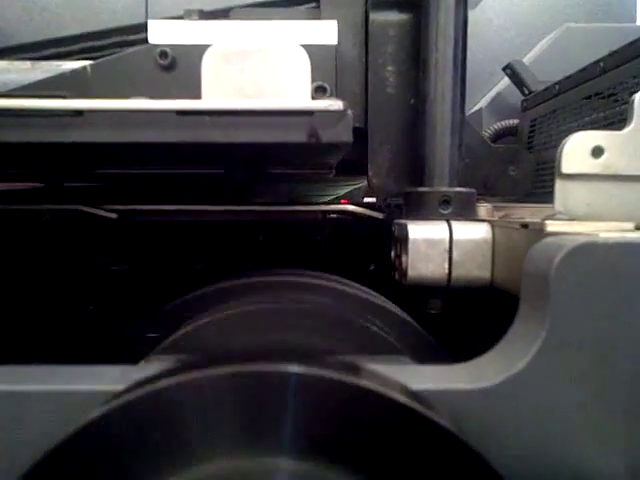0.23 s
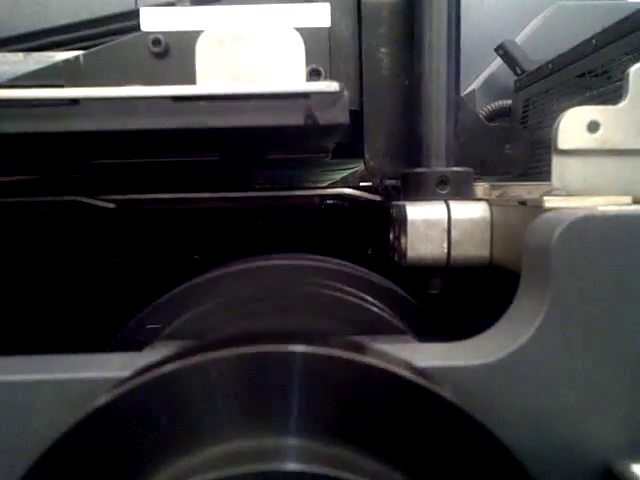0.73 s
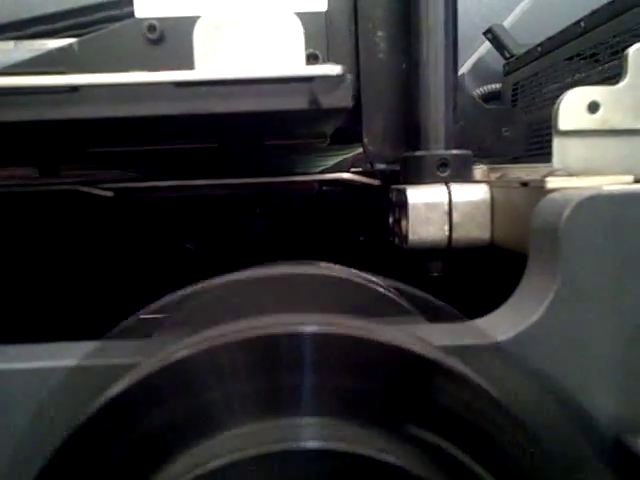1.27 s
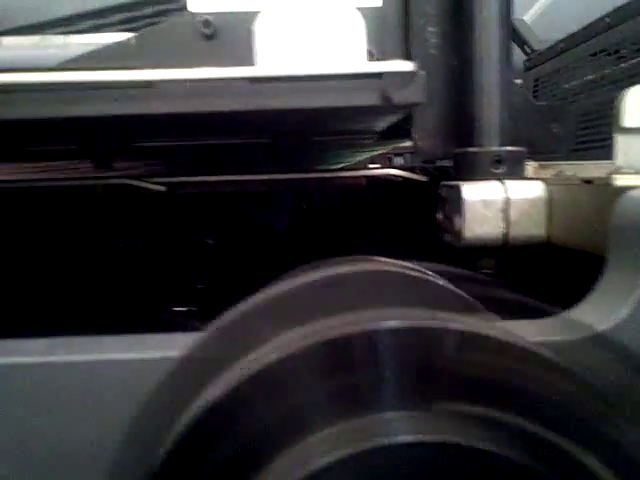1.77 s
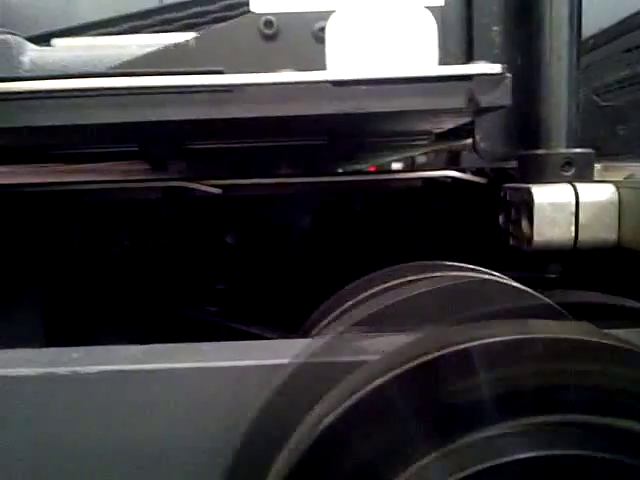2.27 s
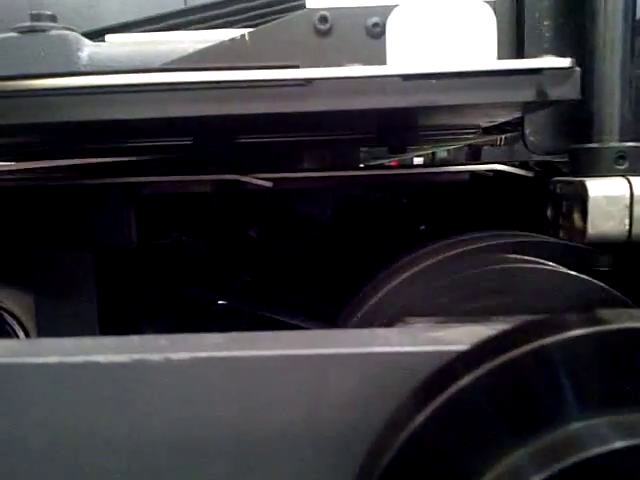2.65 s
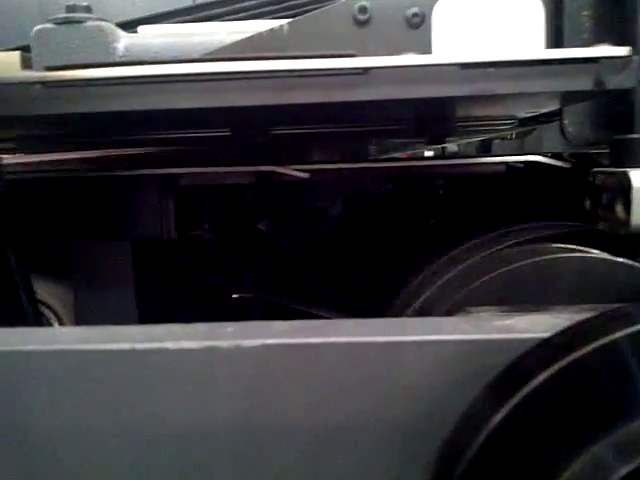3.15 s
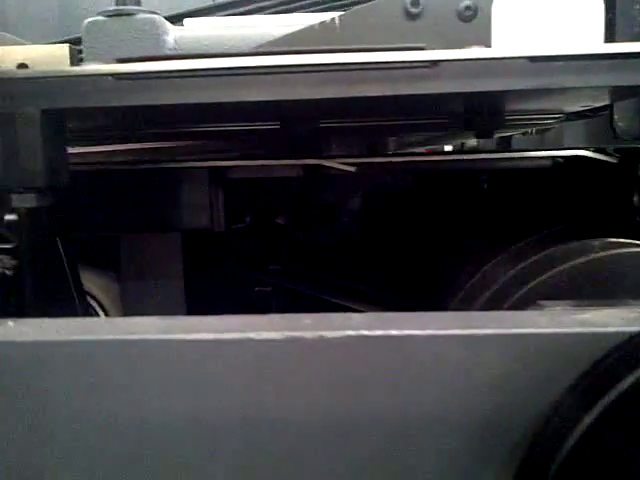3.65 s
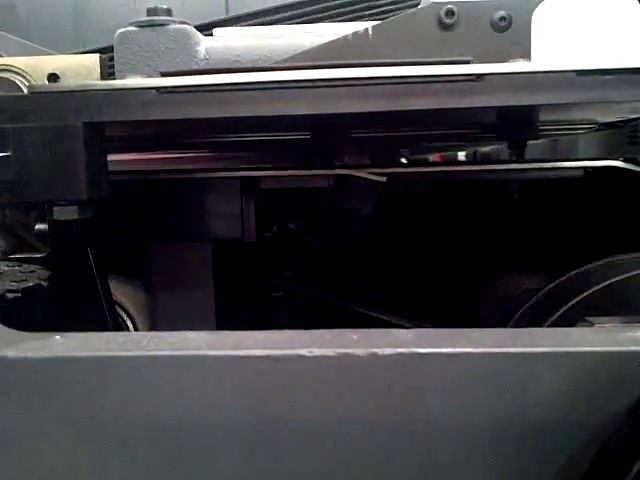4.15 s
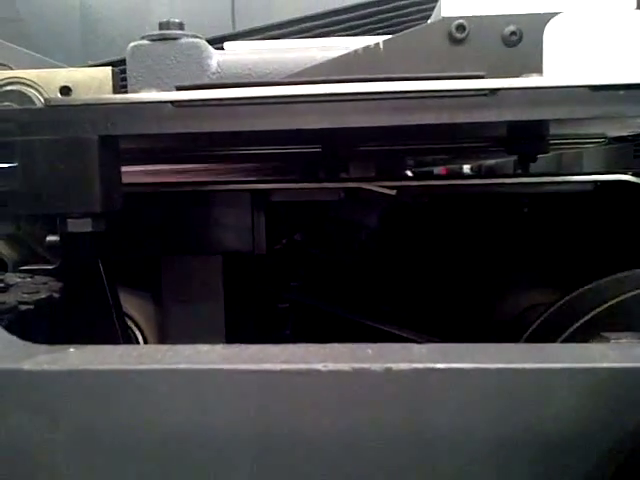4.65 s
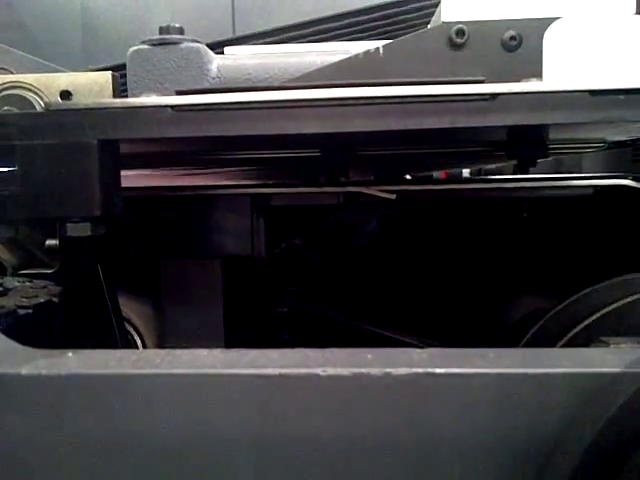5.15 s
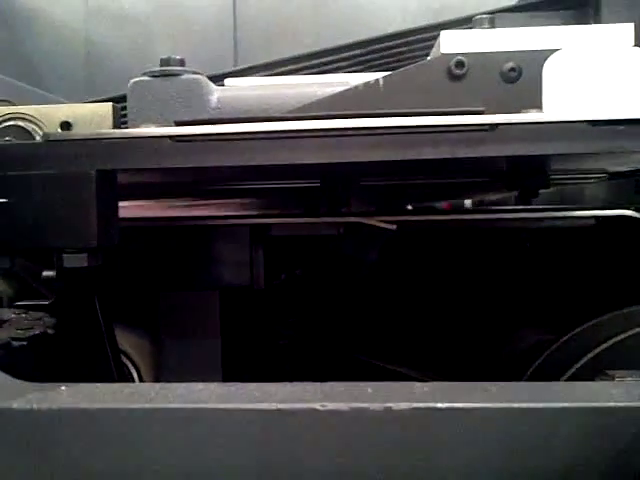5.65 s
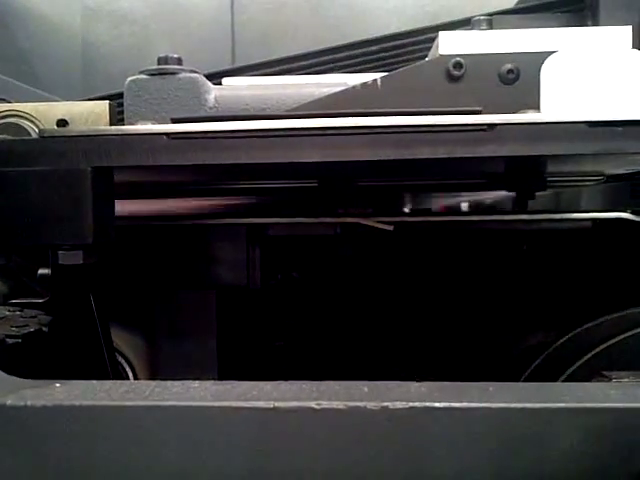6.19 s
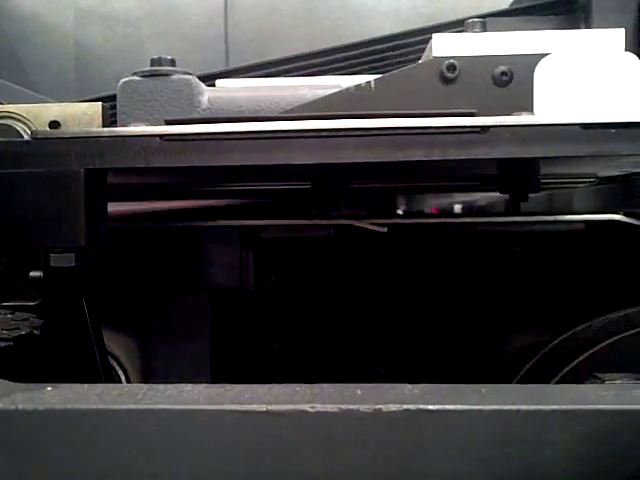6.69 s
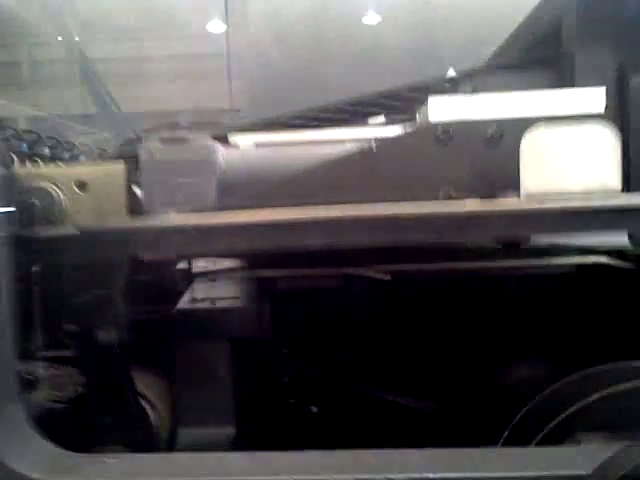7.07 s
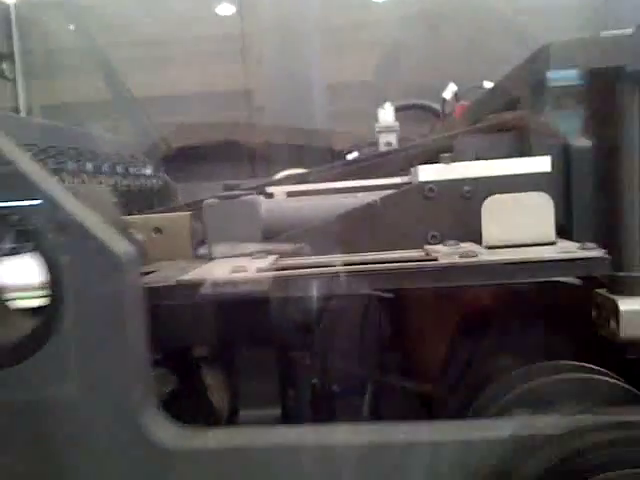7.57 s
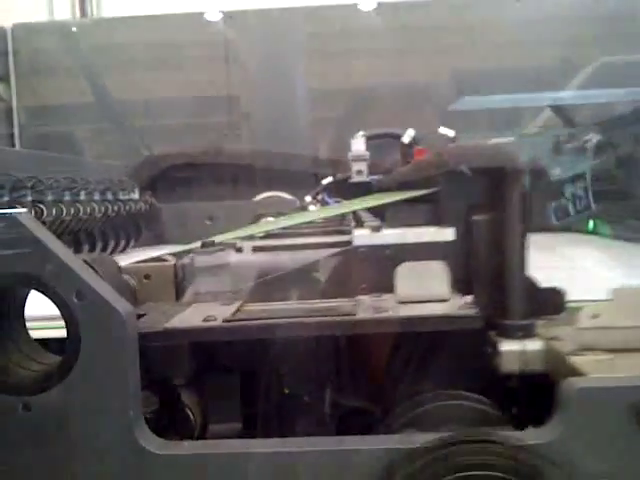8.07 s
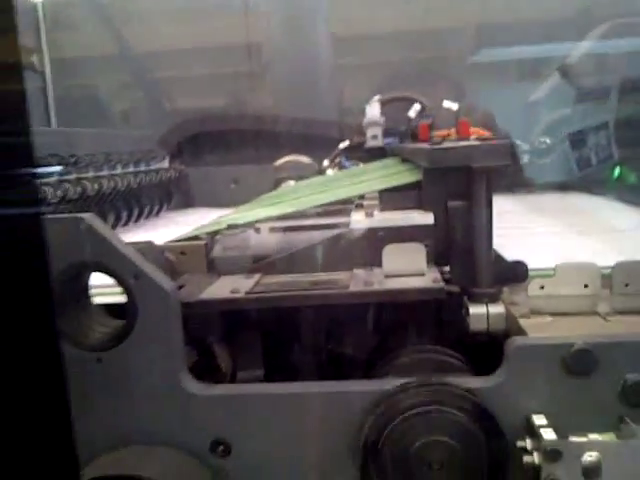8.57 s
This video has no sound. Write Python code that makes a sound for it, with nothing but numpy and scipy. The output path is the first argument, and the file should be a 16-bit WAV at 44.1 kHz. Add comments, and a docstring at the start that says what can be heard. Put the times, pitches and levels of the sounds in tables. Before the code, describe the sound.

A heavy press turns at unchanging speed, heard very near its frame. Hollow rattling taps and panel booms open it, then settle into dense rumble, knocks and gear clatter, with a short clack each turn, some ringing. In the last two seconds the gears recede, swishing paper hiss opens up, and a wavering thin whine and very faint high whistle appear.

```python
"""A large printing press runs steadily, about four turns a second, heard close to its frame and gears.
Each turn brings rumble and gear chatter from repeating random roughness, knocks from damped sines,
a swish of filtered noise for the paper, and a metal clack of noise bursts, on many turns with a ring.
Gears and a motor hum as sums of sines; at first something loose rattles in taps that fall in pitch.
Near the end the microphone lifts away from the gears toward the paper path, and thin whines swell."""
import sys
import numpy as np
from scipy import signal
from scipy.fft import rfft, irfft
from scipy.io import wavfile
from scipy.ndimage import uniform_filter1d, map_coordinates

SR = 44100
rng = np.random.default_rng(int(sys.argv[2]) if len(sys.argv) > 2 else 0)


def wav_out(sig):
    """Save sig, one row per channel (or a flat mono array), as 16-bit PCM at SR to the path in sys.argv[1]."""
    wavfile.write(sys.argv[1], SR, np.round(np.clip(np.atleast_2d(sig).T, -1, 1) * 32767).astype(np.int16))


N = 389400

TURN_HZ = 4.1671  # turns of the main shaft per second
# clacks with their own time and strength, light or hard:
# (time [s], clack level [dB], tick level [dB], centre of the ring [Hz])
LISTED_CLACKS = [(.005, -24, -27.5, 2900), (.247, -28.5, -33, 2900), (.486, -22, -30.5, 2950),
                 (.966, -26, -25, 2800), (1.206, -20, -29, 2650), (1.928, -24, -28, 2900),
                 (2.644, -23, -21, 2710), (2.886, -21.5, -19, 2650), (3.127, -25.5, -23.5, 3000),
                 (3.847, -25, -31, 2710), (4.087, -21, -25.5, 2500), (4.326, -22, -23.5, 2800),
                 (4.565, -29, -18.5, 3400), (5.045, -24.5, -21.5, 3010), (5.286, -26, -21.5, 3400),
                 (5.526, -21, -22, 2720), (6.006, -19, -16, 1650), (6.486, -26.5, -17.5, 3430),
                 (6.966, -23, -23, 2700), (7.4455, -21.5, -13, 1950), (7.6843, -21, -13.5, 2200),
                 (7.925, -25.5, -19.5, 3000), (8.167, -23.5, -30, 2000), (8.406, -23.5, -26.5, 1950)]


def undb(db):
    """Decibels are logarithmic: 20 dB is a factor of ten in amplitude."""
    return 10 ** (np.asarray(db) / 20)


def unit(x):
    """Normalize the mean power: scale to rms 1."""
    return x / np.sqrt(np.mean(x ** 2))


def clock():
    """Uniform sampling: the time of every sample in seconds."""
    return np.arange(N) / SR


def curves(rows):
    """Linear interpolation in time of each column of a table."""
    times, *columns = np.transpose(rows)
    return [np.interp(clock(), times, column) for column in columns]


def swells(rows):
    """Superposed Gaussian swells in dB, from rows of (time [s], half width [s], level [dB])."""
    return sum(db * np.exp(-((clock() - at) / width) ** 2) for at, width, db in rows)


def walk(rate):
    """Low-pass random fluctuation of rms 1: values held for 1 / rate seconds, smoothed twice."""
    hold = int(SR / rate)
    steps = np.repeat(rng.standard_normal(N // hold + 1), hold)
    smooth = uniform_filter1d(uniform_filter1d(steps, hold), hold)
    return unit(smooth[:N])


def colour(x, points):
    """Linear filtering: weight the spectrum of x by (frequency [Hz], level [dB]) points, to rms 1."""
    hz, db = np.transpose(points)
    f = np.maximum(np.fft.rfftfreq(N, 1 / SR), 1)
    gain = undb(np.interp(np.log(f), np.log(hz), db))
    bass_fall = np.minimum(f / hz[0], 1)  # below the first point
    return unit(irfft(rfft(x) * gain * bass_fall, N))


def heard(levels_db, lift):
    """Distance changes the balance: gain of a part at the microphone's height."""
    beside_db, change_db = levels_db
    return undb(beside_db + change_db * lift)


def surface(turns, count):
    """Periodic excitation: a wheel's random roughness comes round again every count turns."""
    size = int(count * SR / TURN_HZ)
    phases = 2 * np.pi * rng.random(size // 2 + 1)
    profile = unit(irfft(np.exp(1j * phases), size))
    return map_coordinates(profile, [turns / count % 1 * size], order=3, mode="grid-wrap")


def rolling(turns, half_speed_db, loose_db):
    """Rolling noise: shaft and half-speed cylinders repeat their roughness; bearing play never does."""
    shaft = surface(turns, count=1)
    cylinders = undb(half_speed_db) * surface(turns, count=2)
    play = undb(loose_db) * rng.standard_normal(N)
    return shaft + cylinders + play


def frame(turns, lift, surge_db, panel_db):
    """Forced vibration: rolling cylinders shake the heavy frame, and a panel booms as the load surges."""
    # relative spectra: (frequency [Hz], level [dB per Hz])
    frame_spectrum, panel_spectrum = [(25, -36), (41, -30), (47, -10), (63, -19), (84, -6.5), (118, -9.5),
                                      (145, -1), (200, 2), (240, -1.5), (320, 1), (430, -1.5), (560, -6.5),
                                      (800, -14), (6000, -80)], [(180, -42), (255, -3.5), (320, -0.5), (385, -2.5),
                                                     (520, -21.5), (2000, -79.5)]
    # booms of the panel: (time [s], half width [s], extra level [dB])
    booms = [(.10, .025, 4.5), (.37, 0.039, 10), (.62, .03, 5), (1.15, 0.043, 7), (1.3, .035, 6),
             (3.1, 0.049, 9)]
    shake = rolling(turns, half_speed_db=-6.5, loose_db=-1.0)
    panel = colour(rolling(turns, half_speed_db=-3.0, loose_db=-2.5), panel_spectrum)
    boom_db = panel_db + swells(booms) + surge_db * walk(12)
    return colour(shake, frame_spectrum) + (1 - lift) * undb(boom_db) * panel


def gears(turns, tooth_depth, flutter_db):
    """Amplitude modulation: gear chatter pulses as teeth and chain links engage."""
    # relative spectrum: (frequency [Hz], level [dB per Hz])
    gear_spectrum = [(300, -19.5), (480, -3.5), (620, -1.5), (760, -2.5), (920, 0.5), (1080, -3),
                     (1380, -2.5), (1650, -7.5), (1850, -11), (2150, -19), (3000, -20), (7500, -71)]
    engagements = (7, 12, 14, 38)  # per turn
    teeth = sum(np.cos(2 * np.pi * (k * turns + rng.random())) for k in engagements)
    chatter = rolling(turns, half_speed_db=-3.5, loose_db=1.5) * (1 + tooth_depth * teeth)
    return colour(chatter * undb(flutter_db * walk(60)), gear_spectrum)


def paper(turns, lift, swish_s, swish_width_s, swish_db, grain_db):
    """Friction noise: paper hisses over rollers with a fine patter and a swish per turn, open from above."""
    # relative spectra: (frequency [Hz], level [dB per Hz])
    beside_spectrum, above_spectrum = [(500, -11), (1000, -2), (1900, -4), (2250, -5), (2800, -1.5),
                                       (3200, -3), (3700, -8), (4100, -7), (4700, -14), (5500, -19),
                                       (6400, -26.5), (7000, -33), (7600, -41.5)], [(500, -4), (1000, -4), (1900, 6.5), (2600, -1),
                                                      (3200, -8.5), (3700, -8.5), (4100, -5), (4700, -15),
                                                      (5500, -20.5), (6400, -25.5), (7000, -33.5),
                                                      (7600, -49)]
    since = turns % 1 / TURN_HZ
    swish = swish_db * np.exp(-((since - swish_s) / swish_width_s) ** 2)
    patter = grain_db * walk(250)
    rub = rolling(turns, half_speed_db=-3.0, loose_db=6.0) * undb(swish + patter)
    return (1 - lift) * colour(rub, beside_spectrum) + lift * colour(rub, above_spectrum)


def tones(turns, lift, mesh_waver_db, mesh_jitter_rad, motor_waver_db, slip_rad):
    """Phase locking: mesh tones follow the turn, while motor, pump and drive tones slip with the load."""
    # gear mesh and shaft tones: (order [cycles per turn])
    mesh_orders = [12, 20, 26, 34, 46, 57, 74, 77, 85, 86, 96, 144, 160, 242, 330, 440, 550, 660]
    # their strength: (relative rms level beside the gears [dB], change above the paper path [dB])
    mesh_levels = [(-40.5, -4.5), (-44, -0.5), (-41, -2.5), (-37.5, 4.5), (-36, -3.5), (-39, -2.5),
                   (-34.5, -5), (-36.5, -6), (-37, -4), (-36.5, -3.5), (-43, 4.5), (-41, -8.5), (-39.5, -2),
                   (-42, -11), (-34, -10), (-46, -5.5), (-49, 3), (-56, -2.5)]
    # free tones: (frequency [Hz], relative rms level beside the gears [dB], change above [dB])
    motor_tones = [(94.8, -35, 1), (189.7, -30, 1), (202, -38, -1), (285, -31.5, -6), (529.4, -35, -3),
                   (999, -34.5, -12.5), (2880, -59, 2)]
    out = np.zeros(N)
    for k, (db, change_db) in zip(mesh_orders, mesh_levels):
        backlash = mesh_jitter_rad * walk(24)  # play between the teeth roughens each tone
        level_db = db + lift * change_db + mesh_waver_db * walk(16)
        out += undb(level_db) * np.sin(2 * np.pi * (k * turns + rng.random()) + backlash)
    for hz, db, change_db in motor_tones:
        slip = slip_rad * walk(5)
        level_db = db + lift * change_db + motor_waver_db * walk(9)
        out += undb(level_db) * np.sin(2 * np.pi * (hz * clock() + rng.random()) + slip)
    return np.sqrt(2) * out  # rms to peak


def drone(turns, lift):
    """Load modulation: swings of load in each turn put sidebands, here separate sines, by the mesh tones."""
    # two mesh tones of the main gears and their sidebands: (order [cycles per turn])
    drone_orders = [110, 112, 113, 114, 120]
    # their strength: (relative rms level beside the gears [dB], change above the paper path [dB])
    drone_levels = [(-37.5, 0), (-28.3, 1.5), (-32, 0), (-34.5, -1), (-29.3, 3.5)]
    # level of the whole drone: (time [s], level [dB])
    drone_swell = [(.25, -6), (.7, -2), (1.3, 0.5), (2.6, -1), (3.05, 2), (4.3, 2), (5.0, -0.5), (5.6, 2),
                   (6.3, -1.5), (7.2, 1.5), (8.6, 0)]
    waver_db, backlash_rad = 2.1, .45
    out = np.zeros(N)
    for k, (db, change_db) in zip(drone_orders, drone_levels):
        level_db = db + lift * change_db + waver_db * walk(16)
        backlash = backlash_rad * walk(24)
        out += undb(level_db) * np.sin(2 * np.pi * (k * turns + rng.random()) + backlash)
    return np.sqrt(2) * undb(curves(drone_swell)[0]) * out


def clacks(rise_s, crack_s, tick_s, bounce_s, bounce_db, tail_s, tail_db):
    """Impact of steel: a bright tick, a crack of dense modes as noise, a rebound and a housing tail."""
    # relative spectra of the crack and of first contact: (frequency [Hz], level [dB per Hz])
    crack_spectrum, tick_spectrum = [(500, -15.5), (1100, -2), (1700, 4.5), (2100, -2.5), (2800, 2.5),
                                     (3500, -5), (4100, -14.5), (4900, -15), (6000, -28.5), (7600, -49.5)], [(1600, -19), (2200, 2.5), (3500, 0), (4800, -10),
                                                    (6300, -30), (7600, -54)]
    usual_at_s, jitter_s = .0058, 0.00049  # place in the turn and its spread
    usual_db, scatter_db = -26, 1.4
    usual_tick_db, tick_scatter_db = -28, 2
    body, edge = np.zeros((2, N))
    listed = {int(at * TURN_HZ): (at, db, tick_db) for at, db, tick_db, _ in LISTED_CLACKS}
    for turn in range(int(N / SR * TURN_HZ) + 1):
        late, strength, sharpness = rng.standard_normal(3)
        usual = (turn / TURN_HZ + usual_at_s + jitter_s * late,
                 usual_db + scatter_db * strength,
                 usual_tick_db + tick_scatter_db * sharpness)
        at, db, tick_db = listed.get(turn, usual)
        start = max(int(at * SR), 0)
        age = np.arange(min(SR // 5, N - start)) / SR
        span = slice(start, start + len(age))
        attack = 1 - np.exp(-age / rise_s)
        rebound = age - bounce_s * rng.uniform(0.87, 1.0)
        second_blow = undb(bounce_db) * (rebound > 0) * np.exp(-abs(rebound) / crack_s)
        tail = undb(tail_db) * np.exp(-age / tail_s)
        body[span] += undb(db) * attack * (np.exp(-age / crack_s) + second_blow + tail)
        edge[span] += undb(tick_db) * attack * np.exp(-age / tick_s)
    out = np.zeros(N)
    for envelope, spectrum in ((body, crack_spectrum), (edge, tick_spectrum)):
        rms = np.sqrt(np.mean(envelope ** 2))
        out += rms * colour(envelope * rng.standard_normal(N), spectrum)
    return out


def steel_ring(ring_db, focus_octaves, detune, rise_s):
    """Modal excitation: each listed clack, light or hard, rings the steel; its contact point favours modes."""
    # modes of the struck steel: (frequency [Hz], relative level [dB], 60 dB decay time [s])
    steel_modes = [(1620, 0, .08), (1934, 0, .14), (2140, -3, 0.054), (2640, 0.5, 0.083), (2990, -4, 0.083),
                   (3380, -4.5, 0.046), (4180, -5.5, .1)]
    out = np.zeros(N)
    hz, mode_db, t60 = np.transpose(steel_modes)[:, :, None]
    age = np.arange(SR // 5) / SR
    for at, db, _, centre_hz in LISTED_CLACKS:
        share = undb(mode_db) / (1 + (np.log2(hz / centre_hz) / focus_octaves) ** 2)
        pitch = hz * (1 + detune * rng.standard_normal(hz.shape))
        decay = np.exp(-np.log(1000) * age / t60)
        modes = share * decay * np.sin(2 * np.pi * (pitch * age + rng.random(hz.shape)))
        attack = 1 - np.exp(-age / rise_s)
        start = int(at * SR)
        out[start:start + len(age)] += undb(db + ring_db) * attack * modes.sum(axis=0)
    return out


def knocks(turns, scatter_db):
    """Damped free vibration: dull cam and lever blows in the frame vary in strength from turn to turn."""
    # blows at fixed places of each turn:
    # (time into the turn [s], pitch [Hz], swell time [s], relative envelope peak [dB])
    blows_per_turn = [(.020, 380, .0015, -16), (.050, 120, .005, -25), (.087, 400, .004, -13),
                      (.094, 205, .004, -18.5), (.121, 390, .003, -17), (.148, 440, .002, -17),
                      (.1645, 370, .0015, -12), (.200, 240, .002, -17), (.2155, 430, .0012, -7)]
    out = np.zeros(N)
    for at, hz, swell, db in blows_per_turn:
        turn, part = np.divmod(turns - at * TURN_HZ + 1, 1)
        age = part / TURN_HZ
        peak_db = db + scatter_db * rng.standard_normal(int(turn.max()) + 1)
        force = undb(peak_db)[turn.astype(int)]
        envelope = age / swell * np.exp(1 - age / swell)
        out += force * envelope * np.sin(2 * np.pi * hz * age)
    return out


def rattle(end_hz, fall_s, swell_s):
    """Dispersion: faster high bending waves of a panel arrive first, so each loose tap falls in pitch."""
    # uneven taps until the loose part settles: (time [s], envelope peak [dB], starting pitch [Hz])
    loose_taps = [(.047, -4.5, 1300), (.087, -9.5, 550), (.110, -5.5, 1000), (.146, -8, 700),
                  (.174, -6.5, 1150), (.235, -6.5, 1150), (.263, -5.5, 1000), (.288, -6.5, 1050),
                  (.305, -6, 450), (.326, -4.5, 1100), (.347, -7, 650), (.368, -5, 450), (.386, -7.5, 900),
                  (.410, -6, 1000), (.468, -6.5, 1050), (.497, -6.5, 1350), (.712, -8, 900)]
    out = np.zeros(N)
    age = np.arange(SR // 30) / SR
    envelope = age / swell_s * np.exp(1 - age / swell_s)
    for at, db, start_hz in loose_taps:
        cycles = end_hz * age + (start_hz - end_hz) * fall_s * (1 - np.exp(-age / fall_s))
        start = int(at * SR)
        tap = envelope * np.sin(2 * np.pi * (cycles + rng.random()))
        out[start:start + len(age)] += undb(db) * tap
    return out


def thumps(hz, swell_s, usual_db, scatter_db):
    """Damped low-frequency impact: the cylinders bump softly once a turn."""
    # bumps with their own level: (time [s], envelope peak [dB])
    set_thumps = [(.19, -21), (.43, -20.5), (1.15, -22), (2.11, -19), (3.07, -20), (3.31, -22), (4.99, -20),
                  (5.95, -20), (6.19, -22), (7.15, -23), (7.87, -20), (8.11, -22)]
    thump_at_s = .188  # place in the turn
    turn, part = np.divmod(clock() * TURN_HZ - thump_at_s * TURN_HZ + 1, 1)
    db = usual_db + scatter_db * rng.standard_normal(int(turn.max()) + 1)
    for at, peak_db in set_thumps:
        db[round((at - thump_at_s) * TURN_HZ) + 1] = peak_db
    age = part / TURN_HZ
    envelope = age / swell_s * np.exp(1 - age / swell_s)
    return undb(db[turn.astype(int)]) * envelope * np.sin(2 * np.pi * hz * age)


def whines(low_slip_rad, high_slip_rad):
    """Frequency modulation: two paper path drives sing with wandering phase, faint until they swell late."""
    # the lower whine bends in pitch: (time [s], frequency [Hz], rms level [dB])
    low_whine = [(7.66, 932, -46), (7.73, 926, -29), (7.8, 919, -29), (7.86, 917, -42), (8.0, 921, -32),
                 (8.12, 917, -35), (8.2, 923, -32), (8.37, 918, -34), (8.5, 921, -28.5), (8.57, 915, -31),
                 (8.65, 917, -43)]
    # a thin, high drive whistle: (time [s], rms level [dB])
    high_whine = [(7.2, -71), (7.88, -64.5), (8.0, -59.5), (8.22, -58.5), (8.48, -65), (8.75, -59)]
    high_hz = 6002
    low_hz, low_db = curves(low_whine)
    low_phase = 2 * np.pi * np.cumsum(low_hz) / SR + low_slip_rad * walk(10)
    high_phase = 2 * np.pi * high_hz * clock() + high_slip_rad * walk(30)
    low = undb(low_db) * np.sin(low_phase)
    high = undb(curves(high_whine)[0]) * np.sin(high_phase)
    return np.sqrt(2) * (low + high)


def scene():
    """Superposition: one shaft angle times most parts, and the microphone's height sets their balance."""
    # height of the microphone: (time [s], height [0 beside the gears - 1 above the paper path])
    lift_path = [(6.95, 0.23), (7.13, 0.65), (7.7, 0.76), (8.05, 0.97)]
    # the din starts a little weaker:
    # (time [s], hum level [dB], chatter and hiss level [dB], rumble and knocks level [dB])
    opening = [(.36, -2.5, -2, -1), (.47, -2, -1.5, -0.5), (.7, 0, 0, 0)]
    # harder knocks, and surges of rough gear clatter: (time [s], half width [s], extra level [dB])
    hard_knocks, clatter_surges = [(2.617, .01, 4), (3.817, 0.0089, 6), (4.297, .01, 2), (6.092, .01, 4)], [(6.765, 0.022, 2.5), (6.96, .035, 1.5),
                                                        (7.213, .016, 3), (8.17, .015, 2)]
    # base gain of each part: (level beside the gears [dB], change above the paper path [dB])
    frame_level, gear_level, paper_level = (-18, -1.6), (-18, -5.5), (-33.5, 6)
    knock_level, hum_level = (-2, -1.5), (0, -0.5)

    turns = TURN_HZ * (clock() + .00008 * walk(1.497))  # the speed is very nearly constant
    lift = np.clip(curves(lift_path)[0], 0, 1)
    hum_db, din_db, body_db = curves(opening)

    # the load on the frame throbs
    throbs_per_turn, throb_at_s, throb_depth_db = 4, 0.035, 1.2
    throb_db = throb_depth_db * np.cos(2 * np.pi * throbs_per_turn * (turns - throb_at_s * TURN_HZ))
    rumble = heard(frame_level, lift) * undb(throb_db) * frame(turns, lift, surge_db=1.0, panel_db=-8.5)

    clatter_db = swells(clatter_surges) * (1 + 0.59 * walk(180))  # roughened surges
    chatter = gears(turns, tooth_depth=0.07, flutter_db=1.0)
    chatter *= heard(gear_level, lift) * undb(clatter_db)
    hiss = heard(paper_level, lift) * paper(turns, lift, swish_s=.208, swish_width_s=0.018,
                                            swish_db=3.0, grain_db=0.8)
    hum = heard(hum_level, lift) * tones(turns, lift ** 2, mesh_waver_db=2.5, mesh_jitter_rad=0.45,
                                         motor_waver_db=2.0, slip_rad=.6)
    song = drone(turns, lift ** 2)
    clack = clacks(rise_s=0.0009, crack_s=0.0042, tick_s=0.0034, bounce_s=0.009, bounce_db=-8.0,
                   tail_s=0.036, tail_db=-4.0)
    ring = steel_ring(ring_db=0.5, focus_octaves=.2, detune=0.012, rise_s=.0014)
    blows = heard(knock_level, lift) * undb(swells(hard_knocks)) * knocks(turns, scatter_db=1.0)
    taps = rattle(end_hz=220, fall_s=0.0028, swell_s=0.0019)
    bumps = thumps(hz=98, swell_s=.011, usual_db=-27, scatter_db=2.0)
    whine = whines(low_slip_rad=.3, high_slip_rad=.5)

    body = undb(body_db) * (rumble + blows + bumps)
    din = undb(din_db) * (chatter + hiss)
    mix = body + din + undb(hum_db) * hum + song + whine + clack + ring + taps
    return mix[None]


def record(dry):
    """Band limiting and soft saturation: cut the deepest bass, round the highest peaks, cut the treble."""
    ceiling, bass_hz, top_hz = .8, 30, 7400
    thin = signal.sosfilt(signal.butter(2, bass_hz, "high", fs=SR, output="sos"), dry)
    rounded = thin / (1 + (thin / ceiling) ** 6) ** (1 / 6)
    return signal.sosfilt(signal.butter(10, top_hz, fs=SR, output="sos"), rounded)


dry = scene()
out = record(dry)
wav_out(out)
```